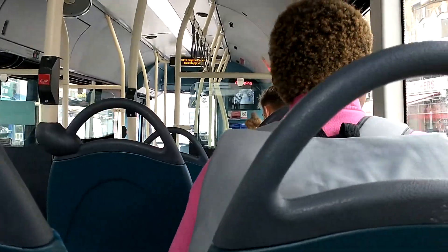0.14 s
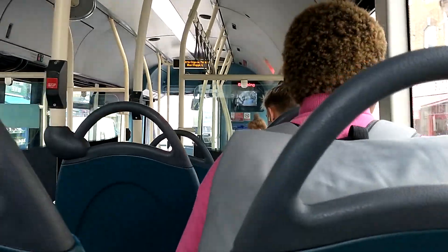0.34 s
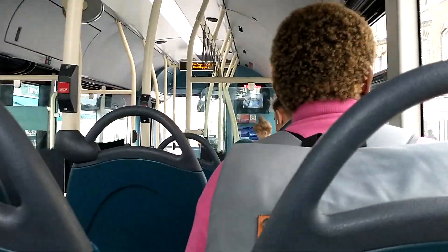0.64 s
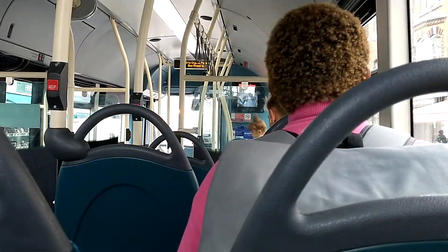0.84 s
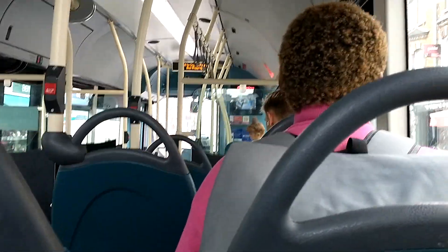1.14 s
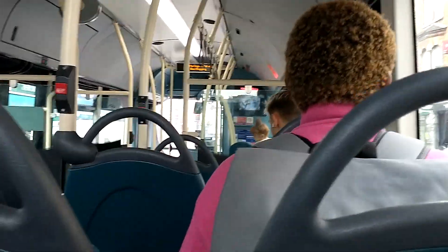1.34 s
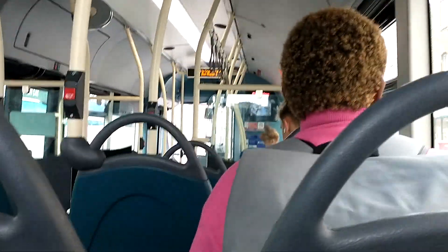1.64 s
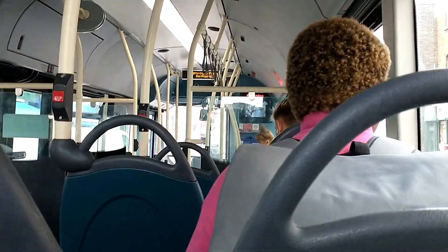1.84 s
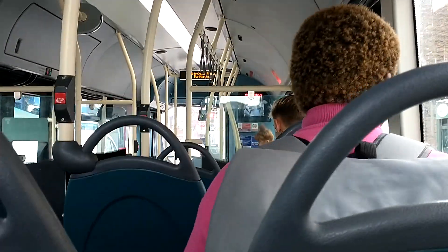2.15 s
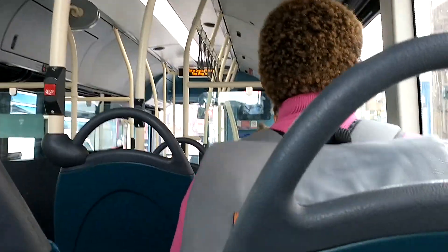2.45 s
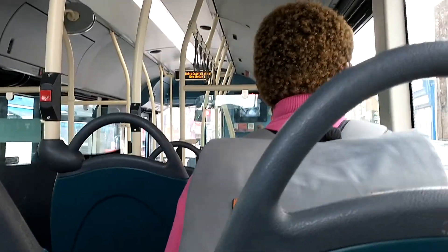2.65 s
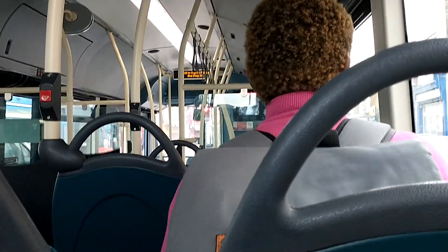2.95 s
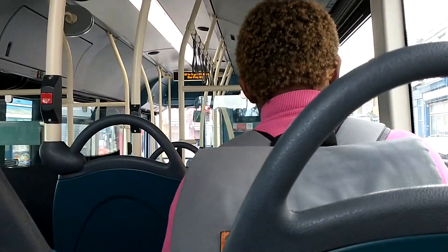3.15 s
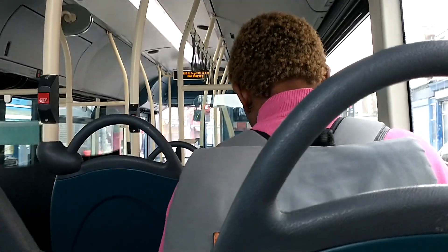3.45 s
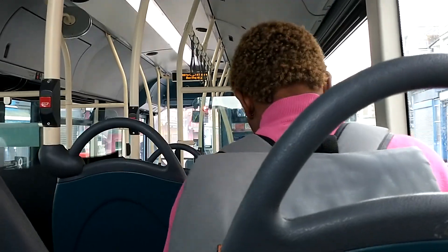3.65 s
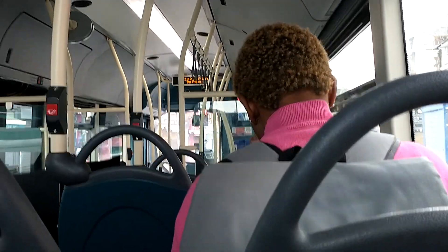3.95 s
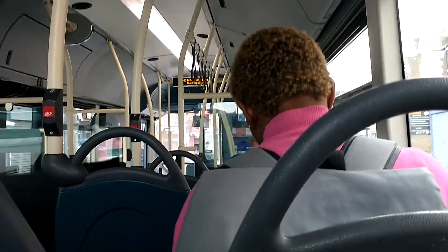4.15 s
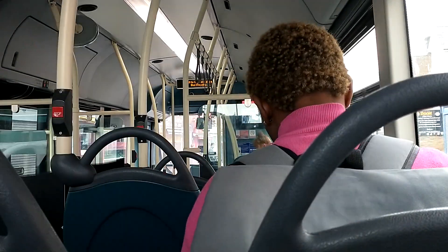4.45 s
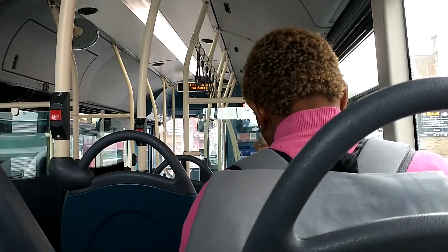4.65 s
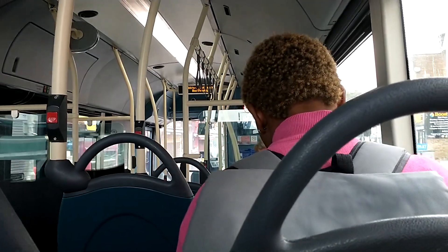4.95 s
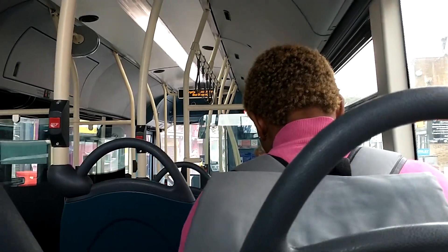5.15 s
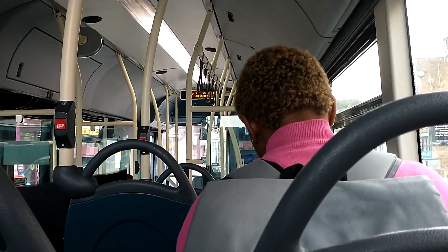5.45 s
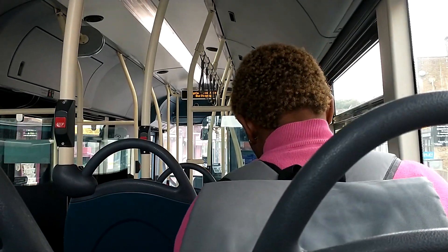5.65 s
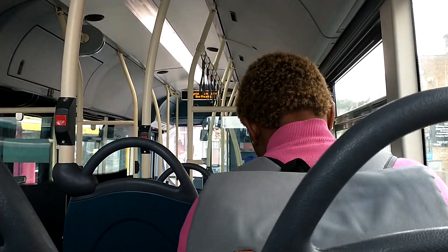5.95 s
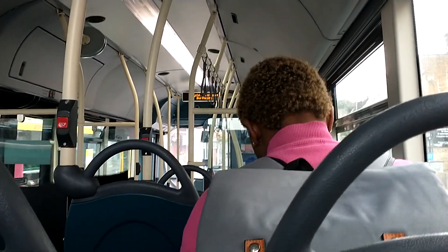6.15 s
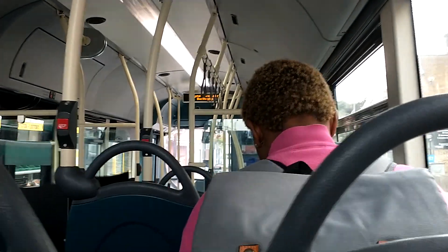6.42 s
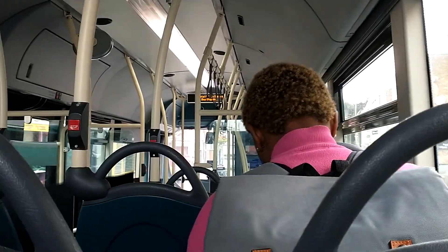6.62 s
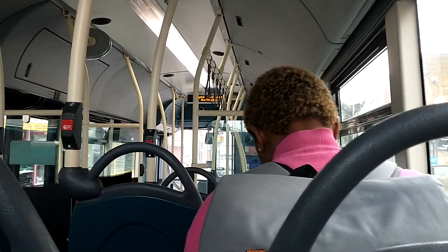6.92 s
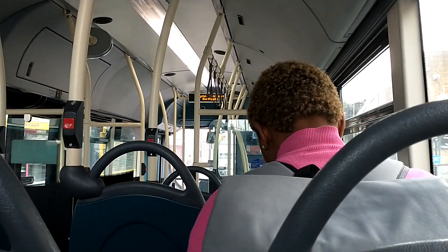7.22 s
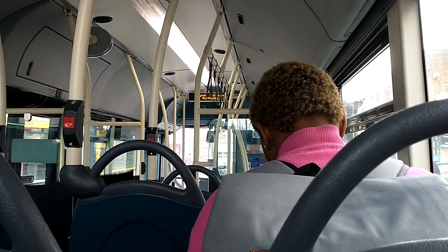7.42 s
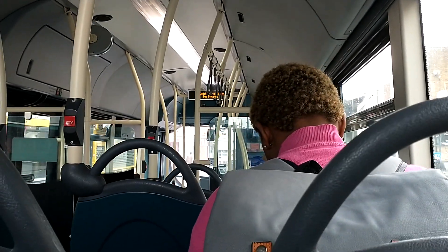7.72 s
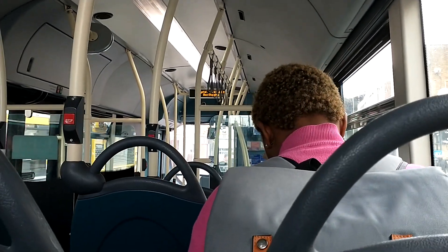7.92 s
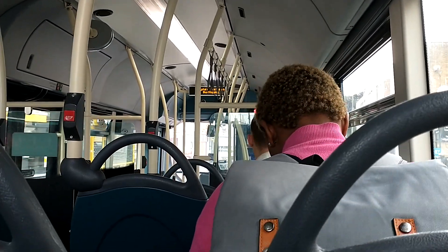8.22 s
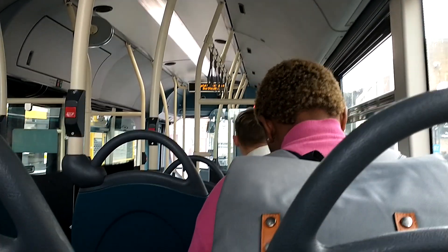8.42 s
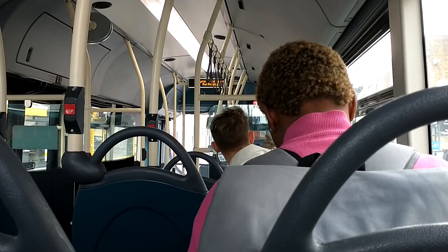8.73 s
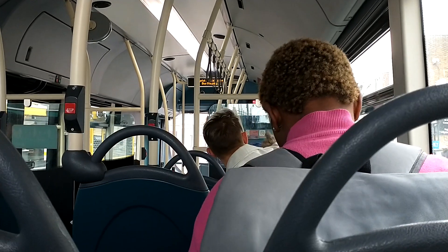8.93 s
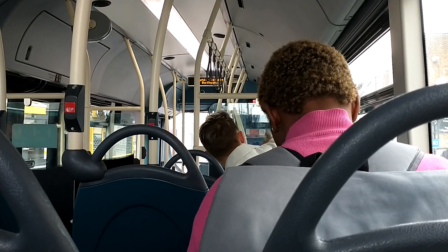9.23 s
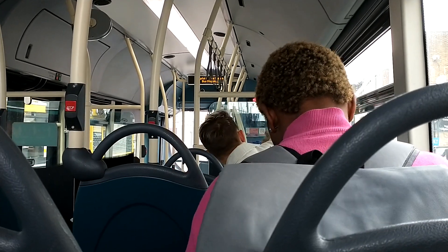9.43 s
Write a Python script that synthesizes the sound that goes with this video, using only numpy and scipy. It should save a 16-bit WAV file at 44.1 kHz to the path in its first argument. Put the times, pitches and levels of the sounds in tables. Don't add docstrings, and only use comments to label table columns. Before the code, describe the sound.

Heard from a passenger seat in a bus: a deep diesel drone and gear hum sink to a throbbing idle while coasting. Loose trim clacks now and then. Halfway, rough road makes panels knock and rattle heavily. It calms to idle with fine ticking and faint, thin brake squeals, then a compressed-air hiss bursts on the left. Stereo, close, enclosed cabin.

```python
import sys
import numpy as np
from scipy import signal
from scipy.fft import rfft, irfft, next_fast_len
from scipy.io import wavfile
from scipy.ndimage import uniform_filter1d, map_coordinates

SR = 44100
rng = np.random.default_rng(int(sys.argv[2]) if len(sys.argv) > 2 else 0)


def boost_factor(decibels):
    exponent = np.asarray(decibels, float) / 20
    return 10 ** exponent


def unload_audio(sound):
    columns = np.transpose(np.atleast_2d(sound))
    steps = np.round(np.clip(columns, -1, 1) * 32767)
    wavfile.write(sys.argv[1], SR, steps.astype(np.int16))


N = 422478
T = np.arange(N) / SR


def evened(x):
    return x / np.sqrt(np.mean(x ** 2) + 1e-20)


def read(points, hz):
    f, value = np.transpose(points)
    return np.interp(np.log(hz + 1), np.log(f + 1), value)


def follow(rows):
    s, *columns = np.transpose(rows)
    return [np.interp(T, s, c) for c in columns]


def during(rows, edge_s=0.03):
    return np.clip(np.minimum(T - rows[0][0], rows[-1][0] - T) / edge_s, 0, 1)


def drift(per_s):
    knots = rng.standard_normal(400)
    steps = map_coordinates(knots, [T[::64] * per_s + 1], order=3).repeat(64)
    return uniform_filter1d(steps, size=64)[:N]


def noise(points, patchy_db=0.0, size=1024):
    hop, hz = size // 4, np.fft.rfftfreq(size, 1 / SR)
    a, b = rng.standard_normal((2, 2, N // hop + 5, len(hz)))
    patches = rng.standard_normal(a.shape[1:])
    for axis in (0, 1):
        patches = uniform_filter1d(patches, size=10, axis=axis)
    z = (a + 1j * b) * boost_factor(read(points, hz) + patchy_db * evened(patches))
    return evened(signal.istft(z.transpose(0, 2, 1), nperseg=size, noverlap=size - hop)[1][:, :N])


def hiss(points):
    size = next_fast_len(N)
    colour = boost_factor(read(points, np.fft.rfftfreq(size, 1 / SR)))
    return evened(irfft(rfft(rng.standard_normal((2, size))) * colour, size)[:, :N])


def resonate(x, hz, width):
    r = np.exp(-np.pi * width / SR)
    stage = [1, 0, -1, 1, -2 * r * np.cos(2 * np.pi * hz / SR), r * r]
    return evened(signal.sosfilt([stage, stage], x + 1e-18))


def modes(x, table):
    return evened(sum(boost_factor(db) * resonate(x, hz, width) for hz, width, db in table))


def struck(x, points):
    log_gain = np.log(boost_factor(np.maximum(read(points, abs(np.fft.fftfreq(8192, 1 / SR))), -100)))
    taps = np.fft.ifft(np.exp(np.conj(signal.hilbert(log_gain)))).real[:4096]
    return signal.oaconvolve(x, taps[None], axes=1)[:, :N]


def impulses(times, db):
    clicks = np.zeros((1, N))
    clicks[0, (np.asarray(times) * SR).astype(int)] = boost_factor(db)
    return clicks


def blows(times, db, t60, rise):
    out, t = np.zeros(N), np.arange(SR // 2) / SR
    for s, d in zip(times, db):
        part = out[round(s * SR):][:len(t)]
        hit = (1 - np.exp(-t / rise)) * boost_factor(d - 60 * t / t60)
        part[:] = np.hypot(part, hit[:len(part)])
    return out


def swells(rows, lean=1.0):
    power = np.zeros(N)
    for s, length, db in rows:
        inside = (T > s) & (T < s + length)
        power[inside] += boost_factor(2 * db) * np.sin(np.pi * ((T[inside] - s) / length) ** lean) ** 2
    return np.sqrt(power)


def pulsing(turns, depth, fall):
    return evened(uniform_filter1d(1 + depth * np.exp(-(turns % 1) / fall), size=250))


# t/s, f/Hz
FIRING_RATE = [(0.0, 44.4), (0.35, 45.8), (0.55, 45), (0.72, 41.8), (0.93, 35), (1.15, 30), (1.33, 29.3),
               (2.45, 29.6), (3.44, 27.1), (4.0, 23.21), (5.55, 21.79), (6.05, 22.35), (7.79, 22.38),
               (9.58, 22.45)]


def firing():
    per_s, = follow(FIRING_RATE)
    return per_s, np.cumsum(per_s) / SR + 0.3


def firing_clicks(turns):
    return (np.diff(np.floor(turns), prepend=0) > 0) * boost_factor(2.0 * rng.standard_normal((1, N)))


# t/s, level/dB
ROAD = [(0, 4.5), (1.9, 1), (2.55, -9), (2.86, 6), (3.15, -8), (3.88, -8), (4.0, 8.5), (4.3, 3), (4.5, 5.5),
        (4.56, 9), (5.05, 9), (5.27, 16), (5.55, 16.5), (5.78, 8.5), (5.94, 0), (8.15, -1.5), (8.6, 12.5),
        (8.9, 1.5)]
# t/s, level/dB
ROLLING = [(0, 2), (1.1, 2), (1.9, 4.5), (2.5, -0.5), (2.8, 4.5), (3.05, -4), (3.25, 5), (3.5, -5.5),
           (3.75, 4.5), (4.5, -0.5), (7.9, 0), (8.45, 2), (8.9, -8.5), (9.5, 2.5)]


def road():
    return follow(ROAD) + follow(ROLLING)


# f/Hz, level/dB (per Hz)
RUMBLE = [(7.1, -27.5), (12, -2), (38, -9.5), (75, 3), (96, 3), (113, -3), (135, 0), (166, -17.5),
          (183, -8.5), (220, -17), (290, -45.5), (480, -120)]


def rumble(rough_db, rolling_db):
    level_db = -33 + rolling_db + 0.076 * rough_db
    return boost_factor(level_db) * noise(RUMBLE, 0.64, size=4096)


# f/Hz, level/dB (per Hz)
ROAR = [(110, -27), (180, -6.5), (252, -3), (424, -8), (561, -11.5), (728, -13), (928, -17), (1780, -20),
        (2450, -22), (3360, -32.5), (4610, -38), (5450, -44.5), (11100, -60), (12600, -60.5), (15500, -69)]
# f/Hz, level/dB (per Hz)
COMBUSTION = [(120, -52), (280, 2.5), (450, -10.5), (750, -5), (900, -20.5), (2500, -32.5), (4000, -57)]


def roar(turns, firings, rough_db, rolling_db):
    level_db = -39.5 + 0.27 * rough_db + 0.084 * rolling_db
    steady = pulsing(turns, 0.29, 0.43) * noise(ROAR, 1.2)
    return boost_factor(level_db) * (steady + 0.22 * evened(struck(firings, COMBUSTION)))


# f/Hz, level/dB (per Hz)
SHAKE = [(59, -41), (100, -7.5), (143, 4.5), (179, -5), (210, -4.5), (253, -22.5), (315, -13), (350, -16.5),
         (389, -13.5), (452, -15.5), (544, -14.5), (597, -23), (735, -20.5), (960, -29), (1600, -32.5),
         (2080, -58), (3520, -120)]
# f/Hz, width/Hz, level/dB
BODY = [(109.1, 10, -1), (132.44, 11, 2), (155.2, 5.8, -1), (199.4, 16, -8), (350.2, 26, -9),
        (443.3, 28, -8), (553, 36, -17), (776.4, 36, -16.5), (1020, 370, -12.5)]
# t/s, peak level/dB
KNOCKS = [(3.961, -19.5), (4.009, -18), (4.047, -17.5), (4.091, -18), (4.352, -16), (4.534, -17),
          (4.581, -12), (4.626, -10.5), (4.674, -12), (4.714, -17.5), (4.808, -19.5), (4.854, -15.5),
          (4.899, -13.5), (4.941, -9), (5.165, -13.5), (5.212, -17.5), (5.357, -31.5), (5.4, -7),
          (5.531, -11.5), (5.579, -17.5), (5.726, -14), (7.811, -25.5), (8.344, -23.5), (8.525, -27.5),
          (8.573, -19.5), (9.529, -20.5)]


def body(turns, firings, rough_db):
    level_db = -34.5 + rough_db + 1.9 * drift(11.0)
    judder = evened(firings) + 1.2 * rng.standard_normal((1, N))
    out = boost_factor(level_db - 3.5) * pulsing(turns, 0.096, 0.98) * noise(SHAKE, 1.0, size=2048)
    out += boost_factor(level_db - 11) * modes(judder, BODY)
    s, db = np.transpose(KNOCKS)
    hits = impulses(s, db + 20)
    return out + boost_factor(-39) * (modes(hits, BODY) + 0.87 * evened(struck(hits, SHAKE)))


# t/s, ring peak level/dB, thud level/dB and treble level/dB relative to the ring
RATTLES = [(1.328, -42, 5.5, -21), (1.487, -53.5, 16.5, -28), (1.91, -47.5, 0.5, -19),
           (2.002, -61, 16, -34), (2.1312, -37.5, -0.5, -27), (2.6455, -48, 1, -36), (2.729, -50, 7, -24.5),
           (2.7913, -41, 2.5, -21), (2.82, -38.5, 2, -23.5), (2.901, -45.5, 9.5, -11.5),
           (3.0772, -38, 1, -36), (3.4847, -48, 6, -36), (3.5494, -57, 1, -8), (3.7458, -35.5, -1.5, -25.5),
           (3.819, -53.5, 10, -14), (3.934, -40, 7.5, -25.5), (4.486, -38, 0.5, -25),
           (4.529, -35, 2.5, -22), (4.669, -36, -3, -25), (4.805, -48, 5, -18), (4.833, -40.5, 6, -15.5),
           (4.938, -33, 1, -22), (5.1444, -38, 7.5, -16), (5.406, -37, 6, -29), (5.482, -31.5, 2, -19),
           (5.5474, -33.5, -6, -19.5), (6.246, -45.5, 1, -17.5), (6.301, -42.5, -4.5, -12),
           (6.308, -41, 0.5, -12), (6.8134, -40.5, -3.5, -23), (8.259, -43, 3, -21.5),
           (9.2696, -45, -4, -14)]
# f/Hz, width/Hz, level/dB
PANEL = [(2506, 410, 12.5), (2230, 300, 9), (4800, 340, -9)]
# start t/s, length t/s, level/dB
BUZZ = [
    (4.47, 0.46, -49),
    (4.81, 0.56, -45.5),
    (5.13, 0.49, -44),
    (5.42, 0.56, -42.5),
]
# start t/s, length t/s, level/dB
FIZZ = [
    (.8, 1.3, -70.5),
    (2.66, 0.57, -70),
    (3.85, 3.3, -67.5),
    (6.2, 2.4, -67),
    (8.75, 0.79, -60.5),
]
# f/Hz, level/dB (per Hz)
THUD = [(350, -17.5), (600, 10), (1200, -0.5), (2000, 1), (2600, -56)]
CLACK = [(2200, -26), (3200, 4), (4600, -5), (5600, -8.5), (7000, -33)]
CLATTER = [(3500, -27.5), (5500, 3), (6500, 2.5), (9000, -3), (11000, -11), (15500, -19.5)]


def rattles():
    t60 = 0.22
    s, db, thud_db, treble_db = np.transpose(RATTLES)
    clack_db = 2 - 0.5 * thud_db + 0.85 * treble_db
    graininess = evened(uniform_filter1d(rng.standard_normal(N), size=120))
    grains = rng.standard_normal((2, N)) * boost_factor(2.3 * graininess)
    ring = np.hypot(blows(s, db - 4.5, t60, 0.0096), swells(BUZZ, lean=0.27))
    out = ring * modes(grains, PANEL)
    out += blows(s, db + thud_db - 4, 2 * t60, 0.0003) * hiss(THUD)
    out += blows(s, db + clack_db - 3, t60, 0.001) * hiss(CLACK)
    fizz = boost_factor(-94) + boost_factor(-6.5) * swells(FIZZ, lean=0.57)
    bright = np.hypot(blows(s, db + treble_db - 3, 1.1 * t60, 0.0005), fizz)
    return out + bright * noise(CLATTER, 3, size=512)


# t/s, peak level/dB
SLAPS = [
    (1.329, -23),
    (2.002, -27.5),
    (2.134, -28.5),
    (4.010, -22),
    (4.785, -30),
    (4.945, -29),
    (5.401, -20),
    (6.311, -38),
]


def slaps():
    hits = impulses(*np.transpose(SLAPS))
    rung = struck(hits, THUD)
    return rung * hits.max() / abs(rung).max()


# t/s, f/Hz, peak level/dB
CHIMES = [(2.133, 2610, -53), (2.135, 4800, -72), (2.648, 2650, -51), (2.822, 2550, -53),
          (2.822, 4820, -63.5), (2.905, 2530, -51), (2.905, 4850, -69), (3.079, 2620, -52),
          (3.08, 4770, -63), (3.486, 2600, -52), (3.486, 4600, -69), (3.79, 4560, -65), (4.49, 4500, -61),
          (4.535, 4600, -62), (4.672, 2500, -47), (4.836, 2600, -48), (4.94, 2590, -48.5),
          (5.17, 2500, -47), (5.57, 4460, -62), (6.305, 4800, -57), (6.309, 1880, -47), (6.308, 2780, -53),
          (6.247, 4500, -64), (6.247, 2420, -63), (6.31, 3400, -54), (2.65, 2400, -53), (3.08, 2350, -53),
          (2.135, 2070, -59), (4.58, 4600, -66), (4.63, 4700, -67), (4.675, 4700, -65), (8.475, 2500, -49),
          (8.475, 6500, -70), (1.329, 1850, -61), (4.94, 1910, -51), (4.488, 2620, -56)]


def chimes():
    out, white = np.zeros((2, N)), rng.standard_normal((2, N))
    t, hold_s, t60, spread = T[:SR // 4], 0.03, 0.12, 0.093
    for s, hz, db in CHIMES:
        a = round(s * SR)
        b = a + len(t)
        envelope = (1 - np.exp(-t / 0.0022)) * boost_factor(db - 60 * np.maximum(t - hold_s, 0) / t60)
        out[:, a:b] += envelope * resonate(white[:, a:b], hz, spread * hz)
    return out


# first t/s, last t/s, rate f/Hz, ring f/Hz
TICKS = [
    (4.1866, 4.76, 23.04, 9450),
    (5.012, 5.47, 45, 6420),
    (5.7142, 5.9, 22.55, 8300),
    (6.1131, 7.36, 22.57, 8900),
    (9.0902, 9.58, 23.01, 9000),
]
# peak level/dB, ring level/dB, growth to the end level/dB
TICKS_DB = [(-58.5, 5, 6), (-59, 2, 3), (-56, -10, 1), (-61.5, -6, 0), (-54, -13, -5.5)]


def ticks():
    out, white = np.zeros((2, N)), rng.standard_normal((2, N))
    for (first, last, per_s, hz), (db, ring_db, growth_db) in zip(TICKS, TICKS_DB):
        s = np.arange(first, last, 1 / per_s)
        place = np.linspace(-1, 1, len(s))
        size_db = db + growth_db * place - 3 * place ** 2 + rng.standard_normal(len(s))
        table = [(hz, 500, ring_db), (0.95 * hz, 2600, 0), (6950, 300, -14)]  # Hz, width Hz, dB
        clicks = impulses(s, size_db)
        rung = modes(clicks, table)
        out += rung * clicks.max() / abs(rung).max()
        out += 0.5 * blows(s, size_db, 0.03, 0.0003) * modes(white, table)
    return out


# f/Hz, width/Hz, start t/s, end t/s, level/dB
SINGING = [(290.5, 6.8, -.3, 1.1, -44.5), (4600, 300, 4.45, 4.8, -72), (8500, 3400, 9.0, 9.7, -71),
           (291, 5.2, 1.8, 2.9, -48.5), (633, 2.3, -.2, 1.3, -51), (690, 13, -1, 1.7, -52.5),
           (724, 18, 1.5, 4.3, -55.5), (808, 24, -.3, 1.2, -52.5), (5340, 180, 4.9, 6.6, -76),
           (5800, 200, 5, 6.0, -72), (6480, 150, 4.8, 5.9, -69), (7390, 100, 5.3, 5.5, -78),
           (8150, 250, 4.74, 4.83, -74), (8100, 250, 4.93, 5.1, -76), (4800, 250, 5.0, 5.3, -70),
           (8600, 300, 5.1, 5.45, -77.5), (9400, 300, 4.8, 5.6, -86), (8400, 2200, 5.68, 5.95, -72.5),
           (13000, 1500, 5.52, 5.6, -76.5), (5400, 830, 9.26, 9.33, -68), (4760, 90, 9.27, 9.5, -79),
           (150.2, 7, 5.05, 5.85, -28.5), (18, 5.5, 2.6, 3.05, -39), (87.8, 10, 1.3, 2.0, -35.5),
           (62.4, 8, 1.7, 2.4, -38), (80.6, 12, 3.1, 3.9, -37.5), (147, 7.3, 4.55, 5.05, -34),
           (110.7, 9.7, 5.2, 5.85, -32.5), (18.1, 5, 2.05, 2.2, -39.5), (88, 16, 2.65, 3.0, -34),
           (91.4, 12, 4.45, 4.75, -31.5), (4900, 900, 6.245, 6.258, -60), (150, 18, 8.2, 8.55, -36.5),
           (5000, 1600, 4.48, 5.1, -72.5), (7000, 150, 6.4, 6.5, -81), (7900, 500, 6.3, 6.4, -77)]


def singing():
    out, white = np.zeros((2, N)), rng.standard_normal((2, N))
    for hz, width, start, end, db in SINGING:
        a, b = max(round(start * SR), 0), min(round(end * SR), N)
        swell = np.sqrt(abs(np.sin(np.pi * (T[a:b] - start) / (end - start))))
        level = boost_factor(db + 2.5 * drift(11.0)[a:b])
        out[:, a:b] += level * swell * resonate(white[:, a:b], hz, width)
    return out


# f/Hz, width/Hz, level/dB, slope/dB per s
WHINE = (12400, 500, -86, -.9)


def whine(turns):
    hz, width, db, slope_db = WHINE
    line = resonate(rng.standard_normal((2, N)), hz, width)
    return boost_factor(db + slope_db * T) * pulsing(turns, 2.5, 0.3) * line


SQUEAL_HZ = (4435, 6849)
# start t/s, length t/s, level/dB
LOW_SQUEAL = [(5.5, .2, -67), (5.92, .1, -71), (5.99, .14, -62), (6.08, .14, -58), (6.23, .05, -65),
              (6.27, .16, -63), (6.41, .05, -65), (6.45, .17, -62), (6.79, .08, -67), (6.85, .15, -65),
              (6.93, .2, -58), (7.09, .15, -62), (7.23, .07, -65), (7.3, .14, -63), (7.42, .25, -71),
              (7.65, .3, -71)]
# start t/s, length t/s, level/dB
HIGH_SQUEAL = [(5.9, .09, -74), (5.98, .12, -71), (6.05, .1, -70), (6.13, .09, -66), (6.23, .02, -70),
               (6.27, .015, -70), (6.31, .09, -68), (6.38, .09, -68), (6.46, .1, -76), (6.54, .06, -77)]


def squeals():
    out, white = np.zeros((2, N)), rng.standard_normal((2, N))
    for hz, rows in zip(SQUEAL_HZ, (LOW_SQUEAL, HIGH_SQUEAL)):
        line = np.cos(2 * np.pi * (hz * T + rng.random((2, 1))))
        fuzzy = line + 0.25 * resonate(white, hz, 45)
        out += boost_factor(3 + 1.2 * drift(40.0)) * swells(rows) * fuzzy
    return out


# t/s, level/dB
AIR = [(8.46, -24), (8.51, -14.5), (8.56, -6), (8.62, -2), (8.83, 1), (8.91, 1), (9.0, -4.5), (9.035, -8.5),
       (9.1, -14.5), (9.16, -24.5), (9.25, -32)]
# f/Hz, level/dB (per Hz)
NOZZLE = [(820, -45), (1400, -31), (1710, 5), (1860, -20), (1940, 4.5), (2110, -1), (2270, 8), (2510, -0.5),
          (2790, 7), (2890, -10), (3000, 9.5), (3300, -12), (4290, -33.5), (7260, -120)]
EDGE = [(2400, -22), (3100, -4), (3520, 4.5), (3850, 2), (4240, -1.5), (5200, -12), (6500, -19),
        (9000, -63.5)]
JET = [(2940, -18), (5000, -2.5), (5600, -8.5), (6740, -6.5), (12300, -15), (14500, -18), (15500, -21.5)]


def air():
    flow_db, = follow(AIR)
    open_valve = during(AIR)
    keep = np.exp(-1 / (0.012 * SR))
    levels_db = [-37.5 + 0.45 * flow_db, -39 + 1.07 * flow_db]
    duct, edge = signal.lfilter([1 - keep], [1, -keep], open_valve * boost_factor(levels_db))
    jet = open_valve * boost_factor(-45.5 + 1.34 * flow_db) * hiss(JET)
    return duct * noise(NOZZLE, 2.3) + edge * noise(EDGE, 0.97) + jet * boost_factor([[1.5], [-3]])


# t/s, f/Hz, level/dB
GEARS = [(0, 133, -33), (.5, 138, -40), (.8, 143, -41), (1.2, 145, -46.5), (1.6, 146, -49), (1.9, 152, -48),
         (2.3, 150, -53.5)]


def gears():
    hz, db = follow(GEARS)
    return during(GEARS) * boost_factor(db + 4.5) * np.cos(2 * np.pi * np.cumsum(hz) / SR)


# t/s, level/dB
LOAD = [(0, 1), (.55, 2.5), (.7, 2.5), (.82, 1.5), (.95, 4), (1.3, -4), (2.4, -1.5), (3.44, -2.5),
        (4.0, -1.5), (5.5, -3.5), (6.05, -5), (7.8, -3.5), (9.3, -3.5), (9.58, -2)]
# multiple of the firing rate, level/dB
ORDERS = [(1, -27.5), (2, -25), (2.5, -52), (3, -30), (3.5, -46), (4, -28.5), (5, -32.5), (5.5, -59),
          (6, -29.5), (6.5, -49), (7, -42), (8, -36), (9, -37)]
# f/Hz, level/dB
BOOM = [(22, 2.5), (29, -5.5), (37, -2), (46, -14.5), (58, -6.5), (70, -2.5), (90, 1.5), (115, -6),
        (190, -12.5), (250, -29), (380, -40)]
# t/s, level/dB above the first, further level/dB above the third
COASTING = [(0, 3, -1), (1.0, -1.5, -2.5), (1.3, 3.5, -6.5), (1.9, 2, -8.5), (2.4, -1.5, -7),
            (3.0, -6.5, -5.5), (3.3, -4.5, -3.5), (3.9, -3.5, -3.5), (4.2, 0.2, -0.3), (8.8, -0.4, 1.5),
            (9.1, 1.7, -4), (9.58, -1, -2.5)]
SHUDDER = [(4, 0), (5, .35), (6, .65), (7, .9), (8, .3), (9, .3)]


def engine(per_s, turns, rough_db):
    (load_db,), (coast_db, upper_db) = follow(LOAD), follow(COASTING)
    out = np.zeros(N)
    for k, db in ORDERS:
        waver = drift(3.0)
        level_db = db + 0.5 + load_db + read(BOOM, k * per_s)
        level_db += (0.7 + 0.25 * k) * waver
        level_db += coast_db * (k > 1) + upper_db * (k > 3.2)
        level_db += np.interp(k, *np.transpose(SHUDDER), left=0) * np.maximum(rough_db, 0)
        out += boost_factor(level_db) * np.cos(2 * np.pi * (k * turns + rng.random()) + 0.036 * k * waver)
    return out


def scene():
    per_s, turns = firing()
    firings = firing_clicks(turns)
    rough_db, rolling_db = road()
    out = rumble(rough_db, rolling_db) + roar(turns, firings, rough_db, rolling_db)
    out += body(turns, firings, rough_db)
    out += rattles() + slaps() + chimes() + ticks()
    out += singing() + whine(turns) + squeals() + air()
    return out + gears() + engine(per_s, turns, rough_db)


# f/Hz, coherence
SAME = [(60, 1.0), (130, 0.99), (290, 0.93), (640, 0.8), (1200, 0.24), (2500, 0.24), (5000, 0.24),
        (15000, 0.082)]
# f/Hz, level/dB
BALANCE_DB = [(60, -1), (110, 0.5), (200, -3), (380, 0.5), (700, 1.5), (1290, 6), (2380, 5.5), (4400, 8),
              (8120, 10.5), (15000, 13)]
# f/Hz, t/s
LAG_S = [(60, 0.000073), (300, 0.00036), (600, 0.00024), (1000, 0.00031), (15000, 0.000453)]


def ports(dry):
    wide = np.pad(dry, ((0, 0), (2048, 2048)), "reflect", reflect_type="odd")
    size = next_fast_len(wide.shape[1])
    hz, (a, b) = np.fft.rfftfreq(size, 1 / SR), rfft(wide, size)
    same, tilt = np.clip(read(SAME, hz), 0, 1), boost_factor(read(BALANCE_DB, hz) / 2)
    left = a * tilt * np.exp(2j * np.pi * hz * read(LAG_S, hz))
    right = (same * a + np.sqrt(1 - same ** 2) * b) / tilt
    return irfft(np.array([left, right]), size)[:, 2048:2048 + N]


def band_limit(x):
    return signal.sosfilt(signal.butter(12, 15700, fs=SR, output="sos"), x)


def record(dry):
    ceiling = 0.42
    mix = ports(ceiling * np.tanh(dry / ceiling))
    return band_limit(mix)


dry = scene()
out = record(dry)
unload_audio(out)
```